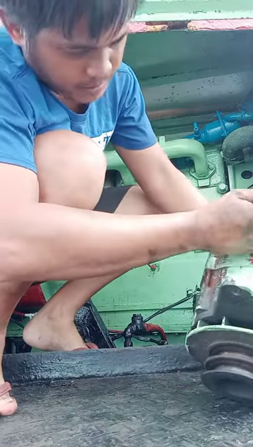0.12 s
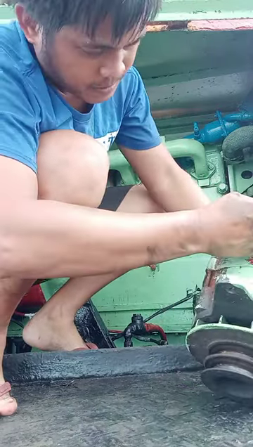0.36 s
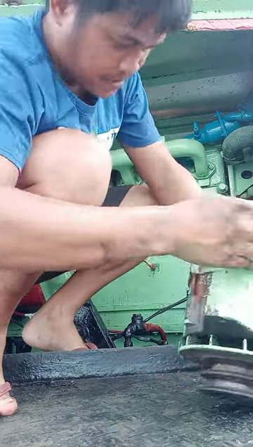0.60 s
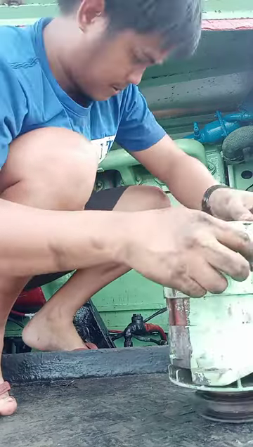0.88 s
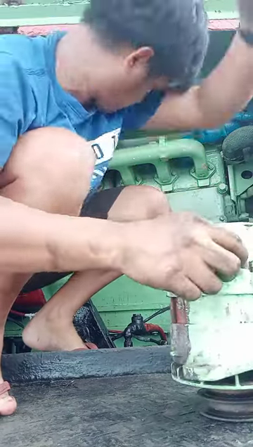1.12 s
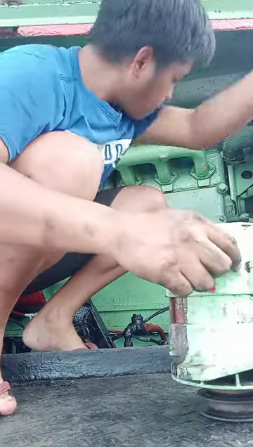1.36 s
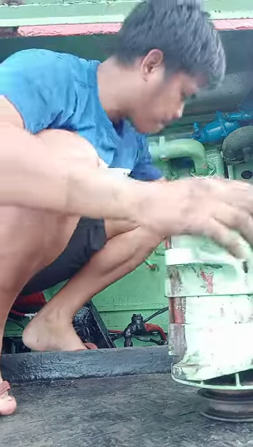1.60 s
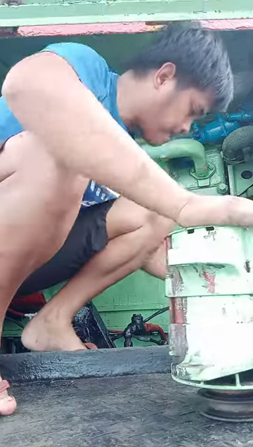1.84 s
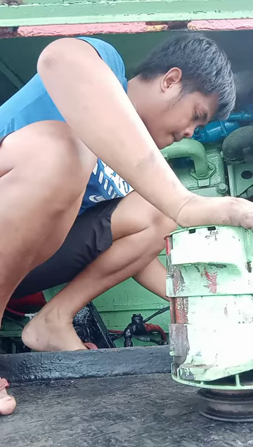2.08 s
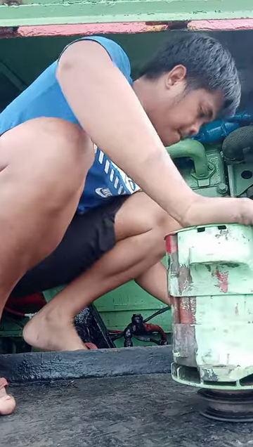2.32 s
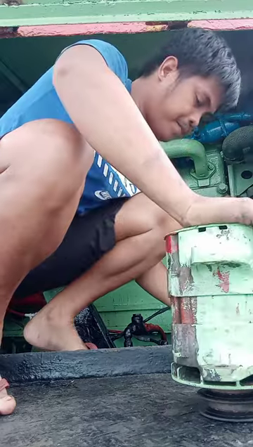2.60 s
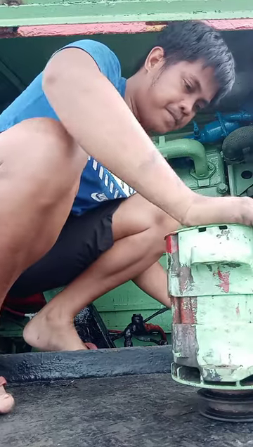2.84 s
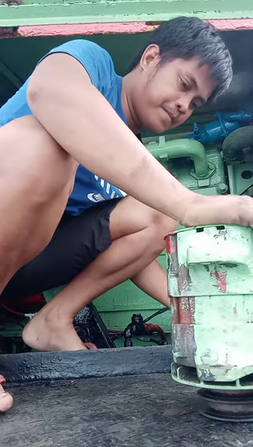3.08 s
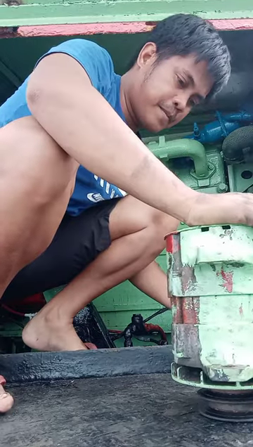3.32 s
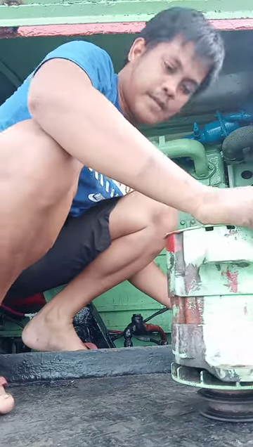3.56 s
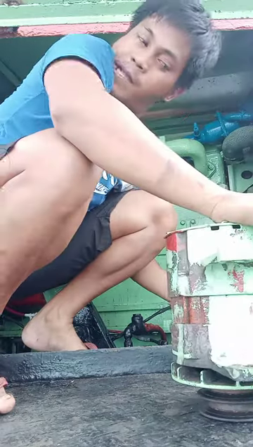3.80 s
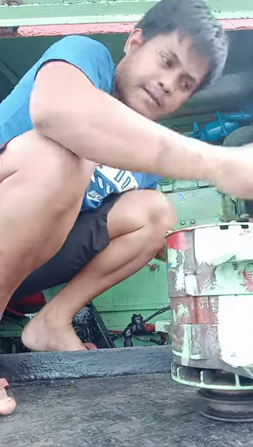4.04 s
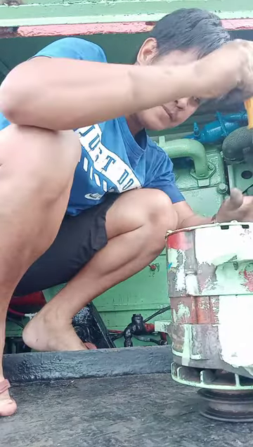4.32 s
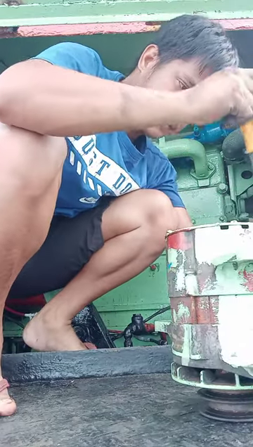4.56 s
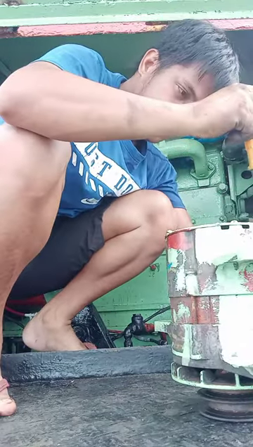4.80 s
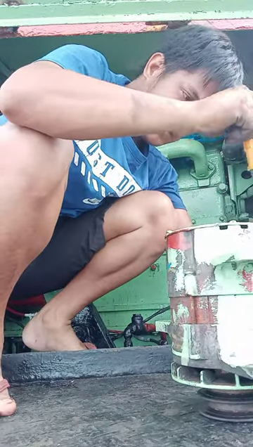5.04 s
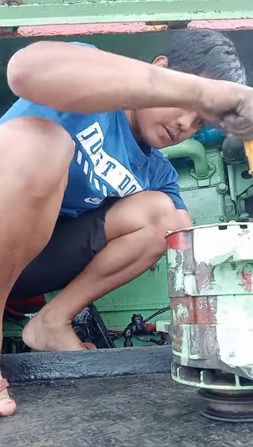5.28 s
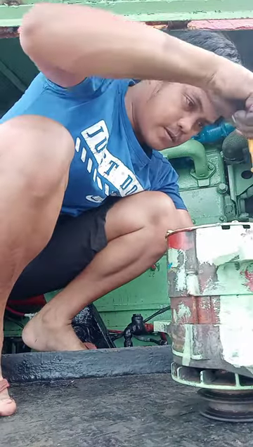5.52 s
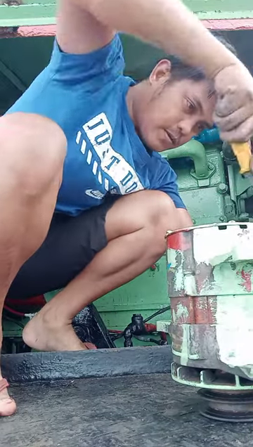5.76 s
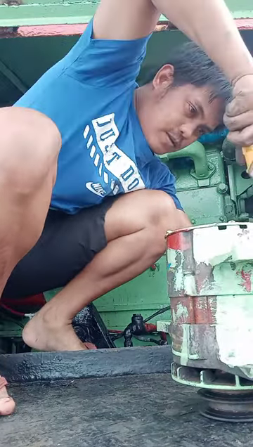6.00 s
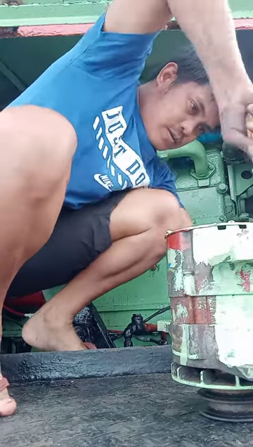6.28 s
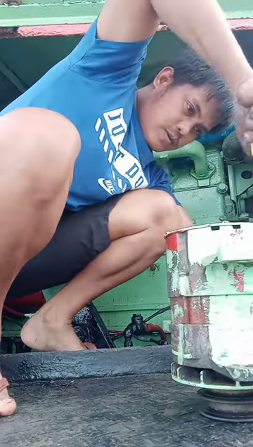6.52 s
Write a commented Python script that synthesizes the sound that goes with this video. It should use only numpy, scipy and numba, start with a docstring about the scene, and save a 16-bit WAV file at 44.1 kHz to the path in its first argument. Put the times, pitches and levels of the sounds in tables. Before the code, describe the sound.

A diesel engine drones steadily in a steel engine room as a heavy metal part thuds down, then small clinks, tool knocks and a click follow.

```python
"""A diesel engine drones at a governed speed in a steel engine room, beside generators and pumps.
Under a second in, a heavy alternator is set down on the deck plate and rocks once; later small parts
clink, a tool knocks and a catch clicks. Machines are wavering sines and noise; struck things are decaying
sines and noise bursts. A phone close by turns its gain down for the thuds and only partly back up."""
import sys
import numpy as np
from scipy import signal
from scipy.fft import rfft, irfft
from scipy.io import wavfile
from scipy.ndimage import uniform_filter1d, minimum_filter1d
from numba import njit

SR = 44100
rng = np.random.default_rng(int(sys.argv[2]) if len(sys.argv) > 2 else 0)


def voltage_ratio(decibels):
    """Convert decibels (scalar or array-like) to amplitude ratios, 20 dB per decade."""
    exponent = np.asarray(decibels, float) / 20
    return 10 ** exponent


def waveform_to_disk(signal):
    """Save audio, clipped to [-1, 1], as 16-bit WAV at the path in sys.argv[1]."""
    frames = np.transpose(np.atleast_2d(signal))
    scaled = np.clip(frames, -1, 1) * 32767
    samples = np.round(scaled).astype(np.int16)
    wavfile.write(sys.argv[1], SR, samples)


N = 292379
T = np.arange(N) / SR
CYCLE_HZ = 14.4925  # engine cycles a second


def walk(rate_hz):
    """Random levels held 1 / rate_hz s and smoothed twice; spread about 0.8."""
    hold = int(SR / rate_hz)
    steps = np.repeat(rng.standard_normal(N // hold + 1), hold)
    return 1.051 * uniform_filter1d(uniform_filter1d(steps, hold), hold)[:N]


def band(x, hz, width_hz):
    """Resonant band-pass, gain 1 at the centre."""
    return signal.lfilter(*signal.iirpeak(hz, hz / width_hz, fs=SR), x)


def cut(x, hz, kind, order):
    """Butterworth low- or high-pass; a higher order is steeper."""
    return signal.sosfilt(signal.butter(order, hz, kind, fs=SR, output="sos"), x)


def ring(modes, extra_db, count, rise_ms):
    """Decaying sines of a struck object; the contact lets them swell briefly."""
    hz, mode_db, t60_s = np.transpose(modes)[:, :, None]
    t = T[:count]
    rise = np.sin(np.pi / 2 * np.clip(1000 * t / rise_ms, 0, 1)) ** 2
    # every mode has a weaker, slightly detuned neighbour, so the ring throbs
    neighbour_hz = hz * (1 + 0.03 * rng.standard_normal(hz.shape))
    pair = np.sin(2 * np.pi * hz * t) + voltage_ratio(-6) * np.sin(2 * np.pi * neighbour_hz * t)
    decay = voltage_ratio(mode_db + extra_db(hz) - 60 * t / t60_s)
    return rise * np.sum(decay * pair, axis=0)


def burst(t60_s, count, rise_ms):
    """Noise that swells briefly and dies away."""
    t = T[:count]
    rise = np.clip(1000 * t / rise_ms, 0, 1)
    return rng.standard_normal(count) * voltage_ratio(-60 * t / t60_s) * rise


def add(out, start_s, x):
    """Mixes x in from start_s on."""
    i = int(start_s * SR)
    out[i:i + len(x)] += x[:N - i]


def tones(table, turns, waver_db):
    """Sines on a shared phase in turns; each swells a little on its own."""
    out = 0
    for multiple, rms_db in table:
        swell = np.sqrt(2) * voltage_ratio(rms_db + waver_db * walk(3.11))
        out = out + swell * np.sin(2 * np.pi * (multiple * turns + rng.random()))
    return out


def roar():
    """Exhaust, fans and hull: half-octave bands of noise that swell together and flicker alone."""
    # noise colour at the phone: hz, density_db [dB per Hz]
    noise_colour = [(25, -79.5), (38, -85), (55, -65), (85, -60), (125, -53), (215, -53), (310, -63.5),
                    (410, -58.5), (500, -66.5), (900, -69), (1700, -77), (2600, -80), (3800, -88),
                    (4500, -100), (5300, -113), (6800, -114), (7600, -117), (8500, -130), (15500, -145)]
    table_hz, density_db = np.transpose(noise_colour)
    hz = np.fft.rfftfreq(N, 1 / SR) + 1
    colour = voltage_ratio(np.interp(np.log(hz), np.log(table_hz), density_db)) * (hz < 15500)
    spectrum = rfft(rng.standard_normal(N)) * colour * np.sqrt(SR / 2)
    out, swell = 0, walk(8.7)
    for octave in np.arange(4, 14.5, 0.5):
        share = np.clip(1 - 2 * abs(np.log2(hz) - octave), 0, 1)
        flicker = walk(13)
        out = out + voltage_ratio(0.16 * swell + 0.73 * flicker) * irfft(spectrum * share, N)
    return out


def clatter():
    """One engine cycle of chance valve and gear rattle, played over and over."""
    # multiples of the cycle that the clatter fills: first, end (exclusive)
    clatter_span = (36, 132)
    rms_db, tilt_db = -64, -6.5  # of a multiple near the 60th; per octave
    k = np.arange(*clatter_span)
    chance = rng.standard_normal((len(k), 2)) @ [1, 1j]
    cycle = np.zeros(4097, complex)
    cycle[k] = 4096 * voltage_ratio(rms_db + tilt_db * np.log2(k / 60)) * chance
    return np.interp(CYCLE_HZ * T % 1, np.arange(8192) / 8192, irfft(cycle))


def machines():
    """The governor holds the engine's speed steady; the other machines drift a little together."""
    # firings and the strongest gear tones: multiple of the cycle, rms_db before the waver
    engine_orders = [(3, -61), (4, -58), (5, -40), (6, -41), (7, -44), (8, -40), (10, -37), (12, -36),
                     (13, -43), (14, -47), (15, -52), (17, -45), (18, -52), (20, -41), (24, -48), (26, -51),
                     (28, -54), (55, -54), (62, -53), (63, -55), (69, -57), (71, -55), (73, -55), (85, -57),
                     (93, -57)]
    # tones of generators and pumps: pitch_hz before the drift, rms_db before the waver
    machine_tones = [(106.5, -46), (200.0, -45), (209.9, -43), (213.1, -44), (227.1, -41), (287.5, -51),
                     (552.1, -60), (599.6, -54), (711.8, -58), (717.2, -54), (799.3, -53), (967.3, -62),
                     (996.6, -58), (1001.8, -59)]
    engine = tones(engine_orders, CYCLE_HZ * T, waver_db=2.0) + clatter()
    drifting = np.cumsum(1 + 0.001764 * walk(2.166)) / SR
    return engine + tones(machine_tones, drifting, waver_db=4.0)


def rustles():
    """Hands brush over metal and cloth: faint, grainy hiss while skin or cloth slides."""
    # strokes: middle_s, length_s, level_db
    strokes = [(0.647, 0.035, -46), (0.975, 0.011, -40.5), (1.255, .03, -38), (1.286, 0.03, -41),
               (5.395, 0.31, -52), (5.593, 0.029, -41.5), (5.925, .04, -50)]
    strength = voltage_ratio(-60 + 4 * walk(5))  # a faint, uneven treble hiss goes on throughout
    for middle_s, length_s, level_db in strokes:
        strength = strength + voltage_ratio(level_db) * np.exp(-(2 * (T - middle_s) / length_s) ** 2)
    return strength * voltage_ratio(3 * walk(80)) * band(rng.standard_normal(N), 6800, 2500)


def clicks():
    """A catch snaps and bounces: a very short ring, a rasp around its pitch and a thin treble edge."""
    # snap and bounces: start_s, level_db, pitch_hz
    snaps = [(6.1672, -14, 3450), (6.1713, -23.5, 3300), (6.175, -31.5, 3450)]
    t60_s = 0.011
    out = np.zeros(N)
    for start_s, level_db, pitch_hz in snaps:
        rasp = burst(t60_s, count=4000, rise_ms=0.79)
        modes = [(pitch_hz, -1.5, t60_s), (6400, -3, t60_s)]
        tone = ring(modes, np.zeros_like, count=4000, rise_ms=0.8)
        body = tone + voltage_ratio(6.5) * band(rasp, pitch_hz, 1300)
        edge = voltage_ratio(9) * band(band(rasp, 6000, 3500), 6000, 3500)
        add(out, start_s, voltage_ratio(level_db) * (body + edge))
    return out


def knocks():
    """A steel tool knocks on the housing: its modes ring in a new balance under a short broad rasp."""
    # modes of the tool: pitch_hz, level_db before the tilt, t60_s
    tool_modes = [(1370, -6.5, .045), (1829, -1, 0.044), (2060, -5, .035), (2575, 3.5, 0.029),
                  (2970, -1.5, 0.028), (3630, -2.5, .035), (6140, -3, .035), (6800, -1.5, 0.035),
                  (7400, -5.5, .03)]
    # knocks: start_s, level_db, tilt_db [dB per octave about 2600 Hz]
    tool_hits = [(4.798, -45, 4), (4.8024, -31, -3), (4.9695, -34.5, -6), (4.98, -21, 1.5),
                 (5.058, -49, 2.5)]
    out = np.zeros(N)
    for start_s, level_db, tilt_db in tool_hits:
        modes = ring(tool_modes, lambda hz: tilt_db * np.log2(hz / 2600), count=4000, rise_ms=1.1)
        rasp = burst(0.035, count=4000, rise_ms=0.94)
        edge = voltage_ratio(9) * band(rasp, 2500, 2800)
        edge += voltage_ratio(11.5 + 1.5 * tilt_db) * band(rasp, 6400, 4000)
        add(out, start_s, voltage_ratio(level_db) * (modes + edge))
    return out


def clinks():
    """A small steel part is nudged: its modes ring in a new balance, with a little rattle."""
    # modes of the part: pitch_hz, level_db before the tilt, t60_s
    part_modes = [(3480, -8, .06), (3570, 0, .08), (3830, -6, .04), (3980, -8, .06), (4170, 0, .04),
                  (4400, -4, .03), (5640, -6, .07), (5900, -4, .04), (7500, -5, .05), (7800, -8, .04),
                  (8500, -8, .1), (11000, -8, .09), (12500, -4, .04)]
    # nudges: start_s, level_db, tilt_db [dB per octave about 3800 Hz]
    nudges = [(2.5452, -37, -10.5), (2.5594, -29.5, -9), (2.587, -31, -5), (2.593, -32, -2),
              (2.6036, -39.5, -3), (2.6695, -43, -14), (2.6774, -47.5, -11)]
    out = np.zeros(N)
    for start_s, level_db, tilt_db in nudges:
        modes = ring(part_modes, lambda hz: tilt_db * np.log2(hz / 3800), count=6000, rise_ms=1.5)
        rasp = burst(0.04, count=6000, rise_ms=1.5)
        rattle = voltage_ratio(11) * band(band(rasp, 4000, 1200), 4000, 1200)
        rattle += voltage_ratio(5) * band(rasp, 2600, 1500) + voltage_ratio(-6) * rasp
        add(out, start_s, voltage_ratio(level_db) * (modes + rattle))
    return out


def drag():
    """The alternator's foot drags between the thuds: grit under it makes a grainy rasp."""
    # the slide: start_s, end_s, level_db, centre_hz
    slide = (.938, 1.032, -18.5, 1900)
    start_s, end_s, level_db, centre_hz = slide
    contact = np.clip(np.minimum(T - start_s, end_s - T) / 0.004, 0, 1)
    grains = voltage_ratio(level_db + 2.5 * walk(250))
    rasp = band(rng.standard_normal(N), centre_hz, 2000)
    return grains * contact * cut(rasp, 2600, "low", order=6)


def thuds():
    """A half-sine push rings the plate, duller the longer the contact; grit and loose parts crunch with it."""
    # modes of the deck plate: pitch_hz, level_db before the spot's balance, t60_s
    deck_modes = [(143, -18, 0.68), (162.4, 2, 0.37), (175.6, -6.5, 0.24), (199.6, -12.5, 0.61),
                  (242.4, -9, 0.49), (381, -16, 0.63), (424, -5, 0.14), (528, -20, 0.39),
                  (601, -14.5, 0.34), (615, -12.5, 0.15), (675, -22.5, 0.41), (827, -18, 0.093),
                  (883, -10.5, .1), (995, -11.5, 0.061), (1236, -13, 0.1), (1386, -15, 0.095),
                  (1542, -16.5, 0.076), (1980, -17.5, 0.05)]
    # blows, each on another spot: start_s, blow_db, contact_ms,
    # low_db [extra for modes under 190 Hz], middle_db [extra for modes at 350-650 Hz]
    blows = [(0.8633, 0.5, 0.23, -3.5, 1), (0.871, -2, 0.41, -1.5, 1), (.888, -5.5, 0.22, 2.5, 2.5),
             (.941, -14.5, 0.18, -2, -6.5), (.979, -14, 0.43, -2, -3), (1.0242, -2, 0.52, 2.5, 6),
             (1.033, -1.5, 0.5, -1, 6.5), (1.062, -1.5, 0.98, -14, 3.5)]
    crunch_db = -7  # under a 0 dB blow of 1 ms; grows with the blow squared and with shorter contact
    out, air = np.zeros(N), np.zeros(N)
    for start_s, blow_db, contact_ms, low_db, middle_db in blows:
        contact = contact_ms * SR / 1000  # samples
        push = np.sin(np.pi * np.arange(0.5, contact) / contact)
        push = push / push.sum()
        spot_db = lambda hz: low_db * (hz < 190) + middle_db * (abs(hz - 500) < 150)
        modes = ring(deck_modes, spot_db, count=30000, rise_ms=1.0)
        # countless weaker plate modes blur into a rumble between the strong ones
        rumble = voltage_ratio(5) * band(burst(0.59, count=30000, rise_ms=25), 260, 180)
        rumble += voltage_ratio(4 + middle_db) * band(burst(0.086, count=30000, rise_ms=4), 900, 670)
        add(out, start_s, voltage_ratio(blow_db) * np.convolve(modes + rumble, push))

        crunch = band(burst(0.06, count=9000, rise_ms=0.4), 1100, 900)
        sharp = burst(0.045, count=9000, rise_ms=0.3)
        crunch += voltage_ratio(4) * band(band(sharp, 2100, 1100), 2100, 1100)
        crunch += voltage_ratio(-10.5) * band(burst(0.15, count=9000, rise_ms=9), 3600, 1500)
        add(out, start_s, voltage_ratio(crunch_db + 2 * blow_db) / contact_ms * np.convolve(crunch, push))

        # loose screws and windings rattle on for a moment
        rattle = burst(0.4, count=15000, rise_ms=3)
        add(out, start_s, voltage_ratio(blow_db - 25.5) * band(rattle, 2800, 2500))
        add(air, start_s, voltage_ratio(blow_db - 34.5) * band(rattle, 6500, 3000))
    # the plate is too small to send out deep bass; paint and grit soften the snap
    out = cut(out, 4200, "low", order=6)
    out = cut(out, 146, "high", order=6)
    return cut(out, 2700, "low", order=2) + air


def room(x):
    """Steel walls send back a thin, diffuse tail."""
    tail = band(burst(0.33, count=40000, rise_ms=21), 2500, 2400)
    return signal.fftconvolve(x, voltage_ratio(-46.5) * tail)[:N]


def port(x):
    """The microphone port shades the treble: a causal minimum-phase filter made from its cepstrum."""
    # response of the port: hz, gain_db
    port_response = [(20, 5.5), (4100, -3), (4500, -4.5), (5100, -21), (7600, -23), (9000, -37),
                     (15500, -39.5)]
    table_hz, gain_db = np.transpose(port_response)
    hz = np.fft.rfftfreq(1024, 1 / SR) + 1
    gain = voltage_ratio(np.interp(np.log(hz), np.log(table_hz), gain_db))
    cepstrum = irfft(np.log(gain))
    cepstrum[1:512] *= 2
    impulse = irfft(np.exp(rfft(cepstrum[:512], 1024)))
    return signal.fftconvolve(x, impulse)[:N]


def scene():
    """Machinery all round, handling close by."""
    handling = rustles() + clicks() + knocks() + clinks() + drag() + thuds()
    return (roar() + machines() + port(handling + room(handling)))[None]


@njit
def follow(x, attack, release, rest):
    """Level follower with its own rise and fall rates, sinking no lower than a resting level."""
    e, out = rest, np.empty(len(x))
    for i in range(len(x)):
        goal = max(abs(x[i]), rest)
        e += (goal - e) * (attack if goal > e else release)
        out[i] = e
    return out


def roll_off(x):
    """The treble ends steeply here."""
    return signal.sosfilt(signal.butter(12, 15500, fs=SR, output="sos"), x)


def record(dry):
    """A look-ahead limiter, a gain control that holds and then recovers, and a slow one that stays down."""
    ahead = abs(np.pad(dry[0], (0, 480))[480:])  # 11 ms early
    rest = voltage_ratio(-10)
    limit = follow(ahead, 1 / (0.0015 * SR), 1 / (0.05 * SR), voltage_ratio(-14))
    held = -minimum_filter1d(-ahead, size=9001, origin=4500)  # highest level of the last 0.2 s
    quick = follow(held, 1 / (0.015 * SR), 1 / (0.15 * SR), rest)
    slow = follow(ahead, 1 / (0.1 * SR), 1 / (30 * SR), rest)
    gain = (voltage_ratio(-15.5) / limit) ** 0.31 * (rest / quick) ** 0.13 * (rest / slow) ** 0.29
    circuit_hiss = voltage_ratio(-88) * rng.standard_normal(N)
    rounded_peaks = np.tanh(0.79 * dry * gain) / 0.81
    return roll_off(rounded_peaks + circuit_hiss)


dry = scene()
out = record(dry)
waveform_to_disk(out)
```